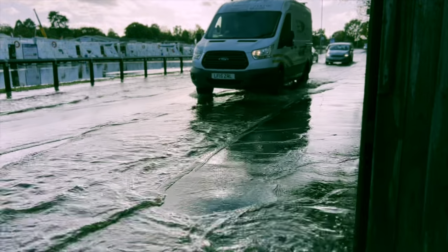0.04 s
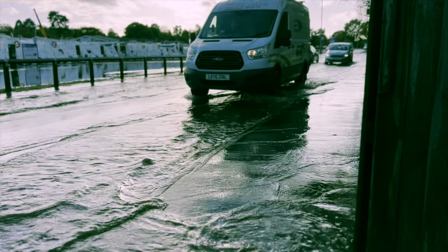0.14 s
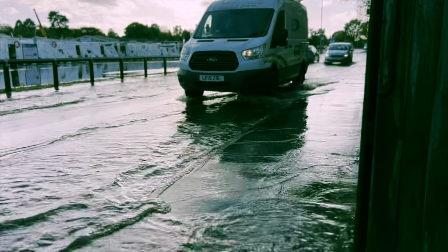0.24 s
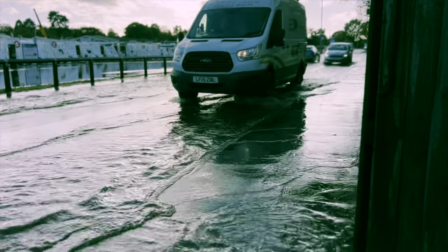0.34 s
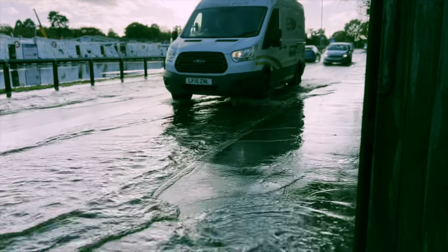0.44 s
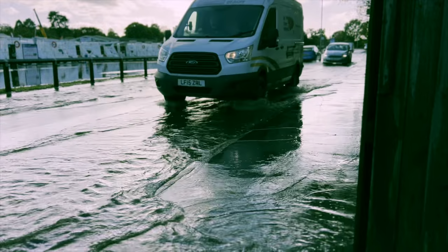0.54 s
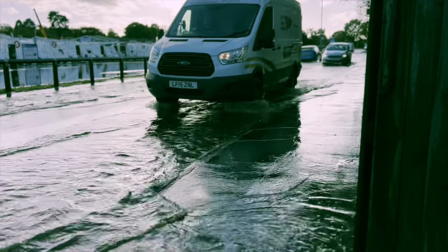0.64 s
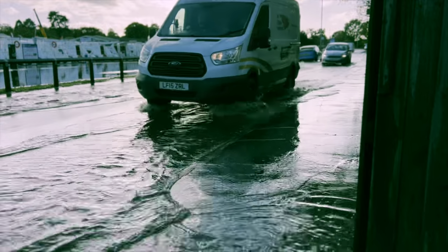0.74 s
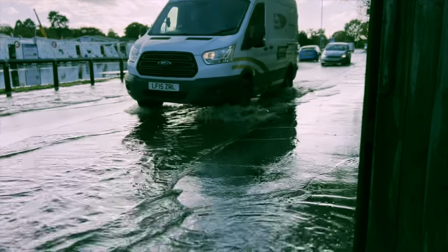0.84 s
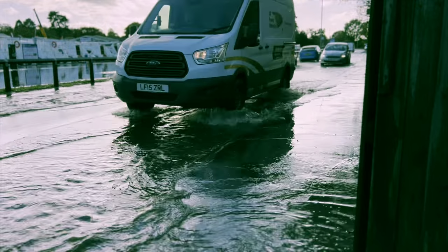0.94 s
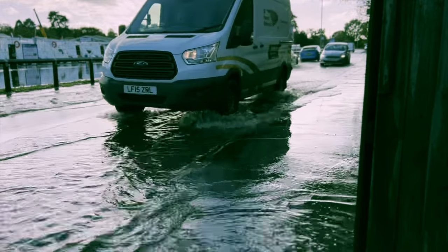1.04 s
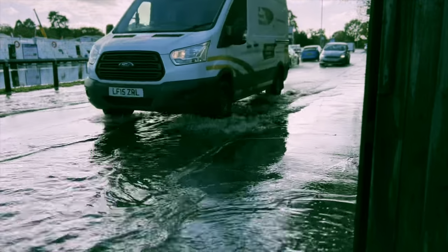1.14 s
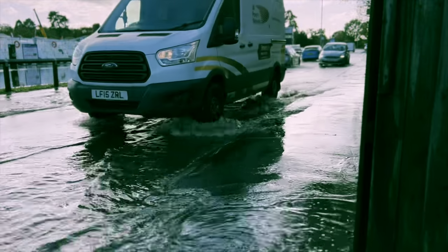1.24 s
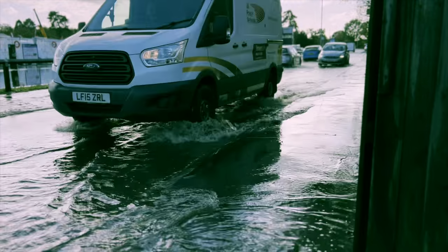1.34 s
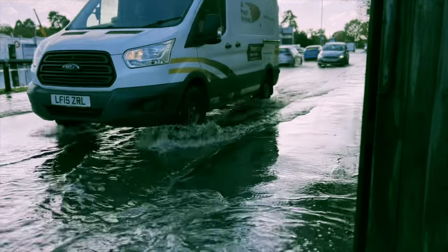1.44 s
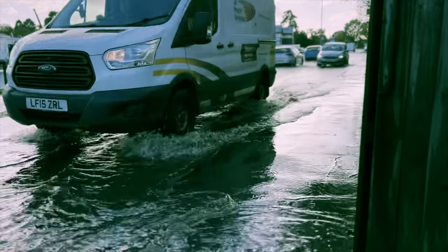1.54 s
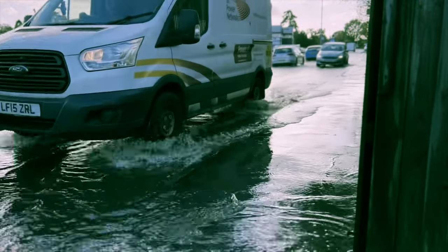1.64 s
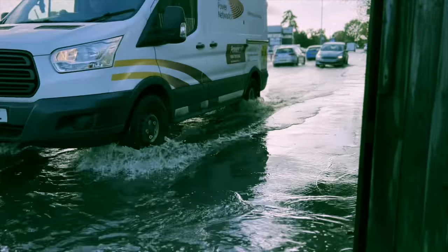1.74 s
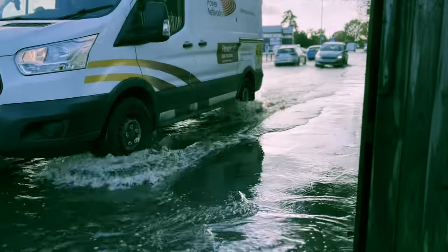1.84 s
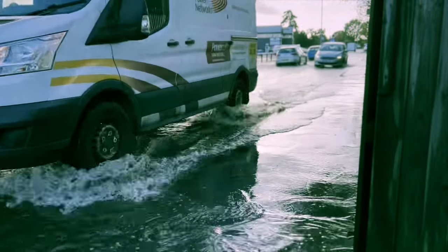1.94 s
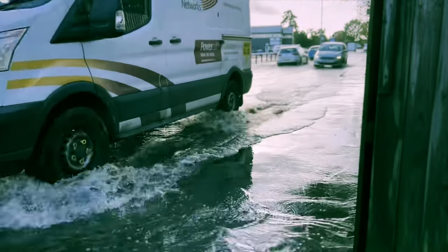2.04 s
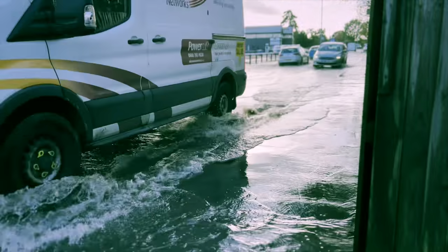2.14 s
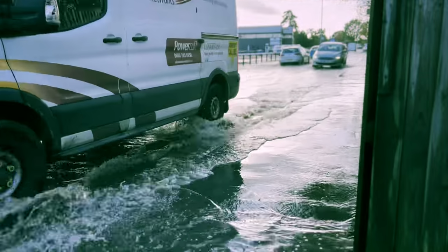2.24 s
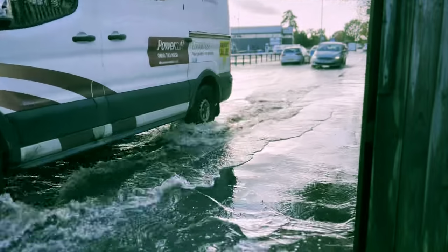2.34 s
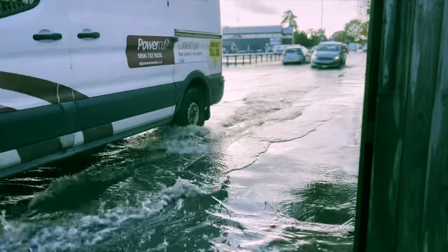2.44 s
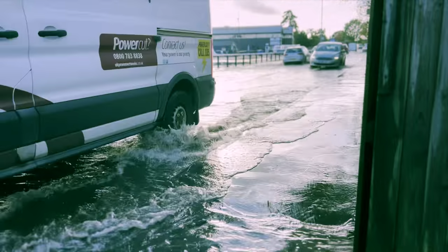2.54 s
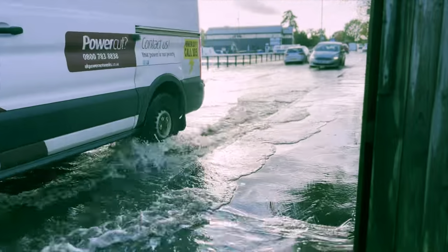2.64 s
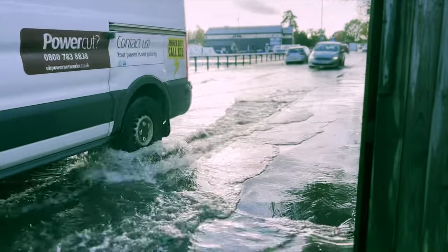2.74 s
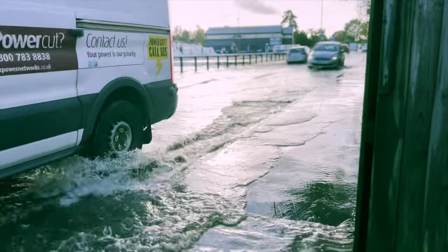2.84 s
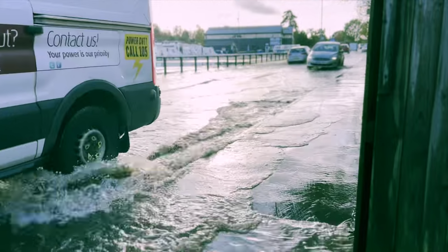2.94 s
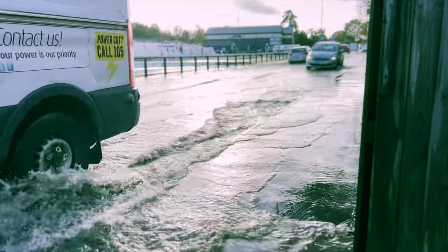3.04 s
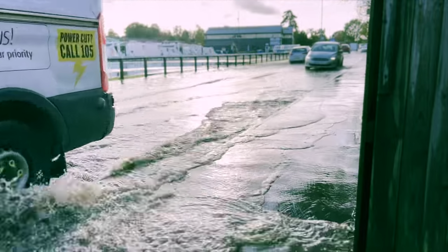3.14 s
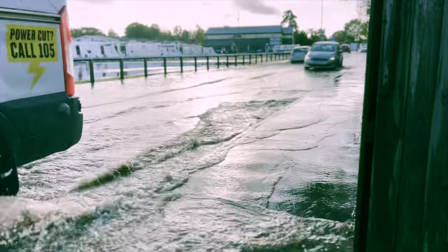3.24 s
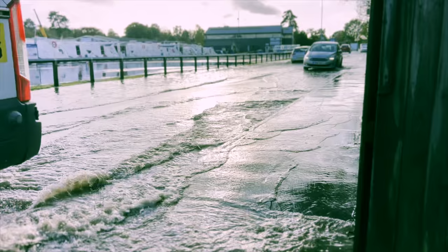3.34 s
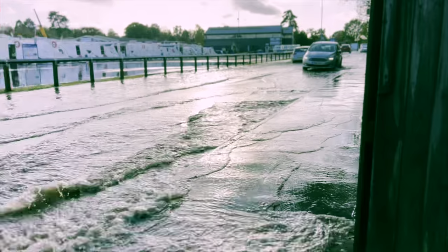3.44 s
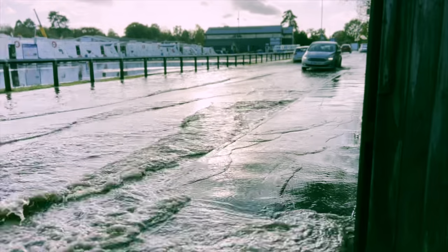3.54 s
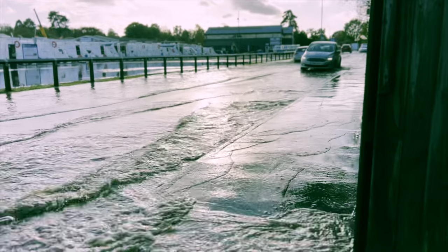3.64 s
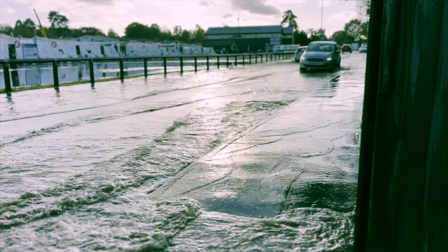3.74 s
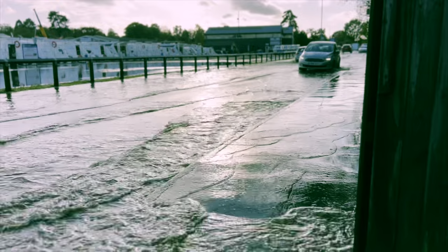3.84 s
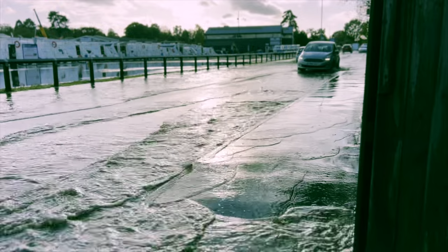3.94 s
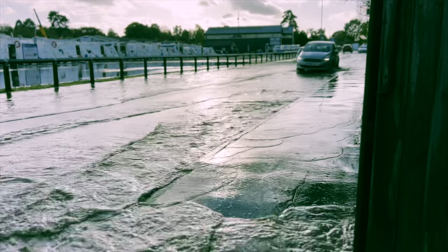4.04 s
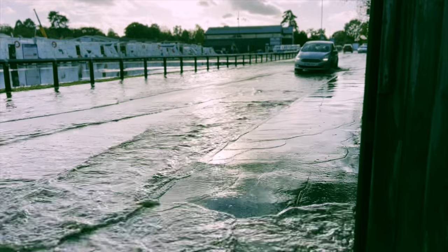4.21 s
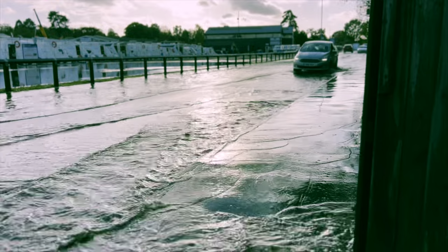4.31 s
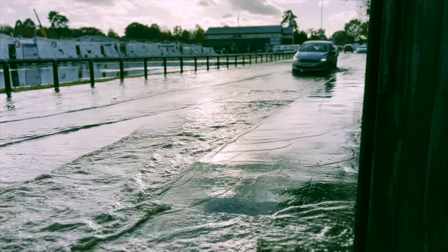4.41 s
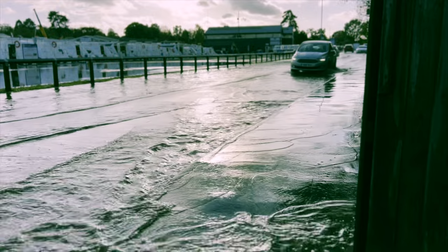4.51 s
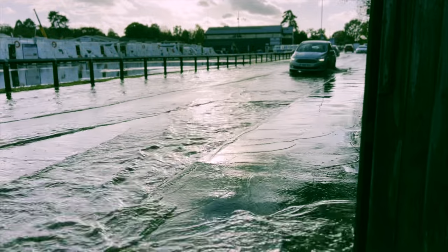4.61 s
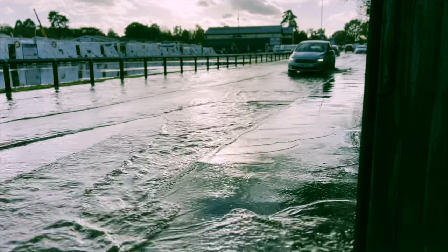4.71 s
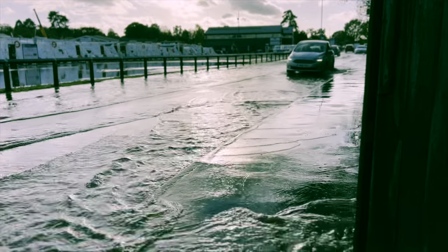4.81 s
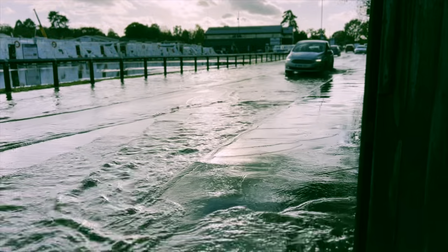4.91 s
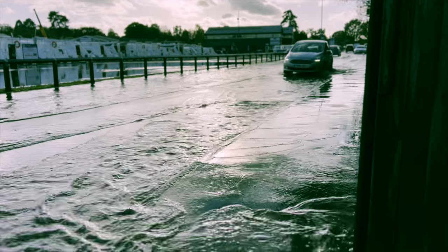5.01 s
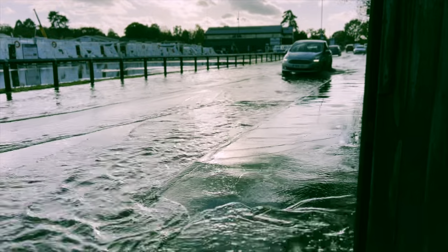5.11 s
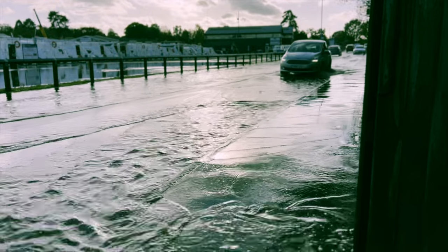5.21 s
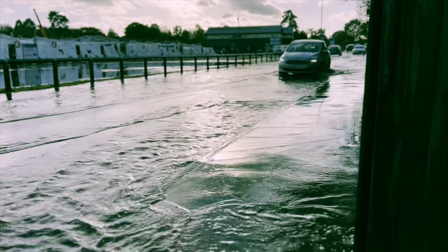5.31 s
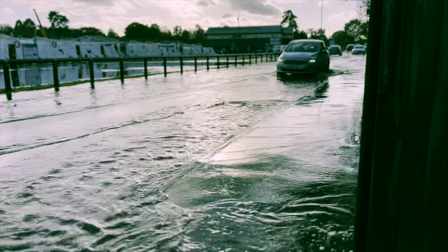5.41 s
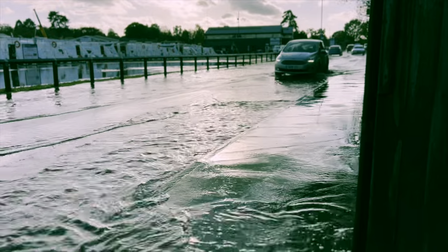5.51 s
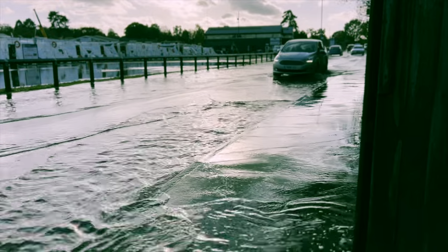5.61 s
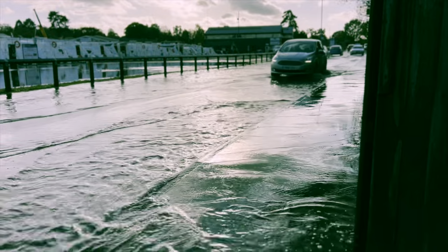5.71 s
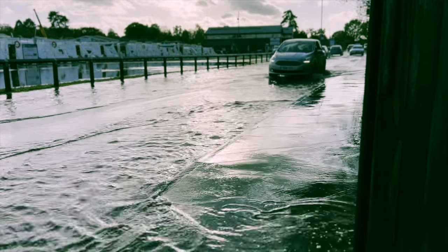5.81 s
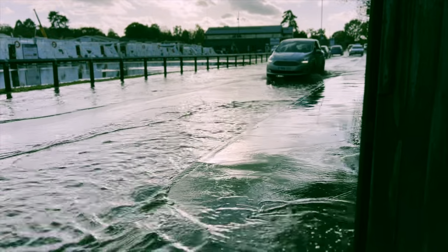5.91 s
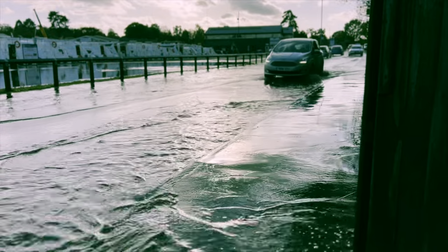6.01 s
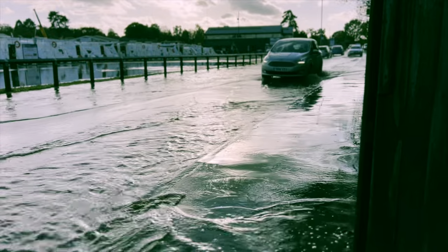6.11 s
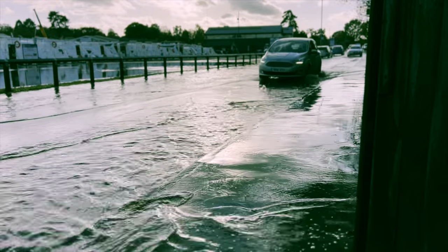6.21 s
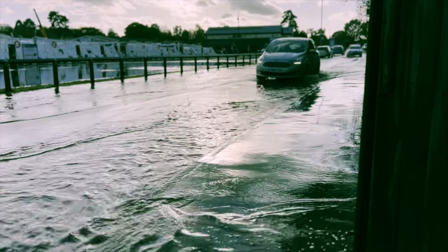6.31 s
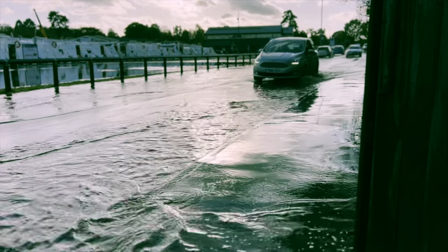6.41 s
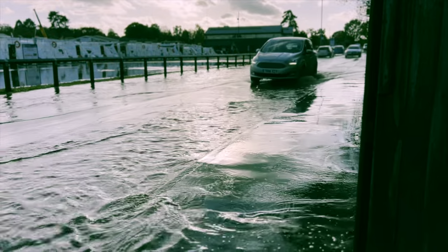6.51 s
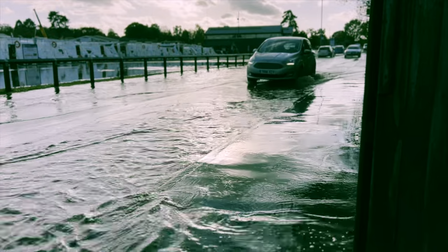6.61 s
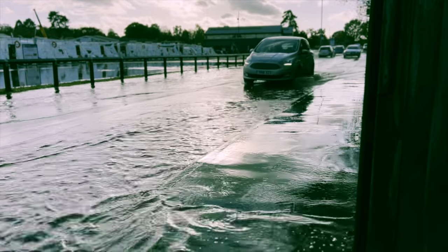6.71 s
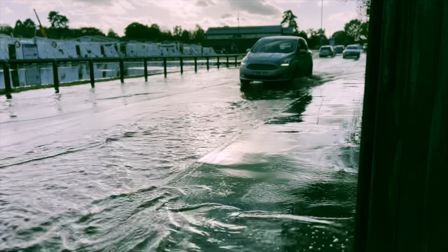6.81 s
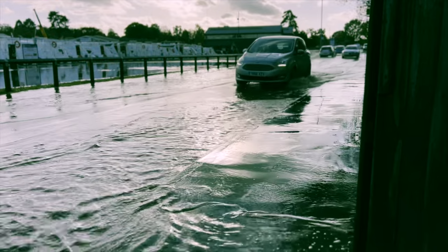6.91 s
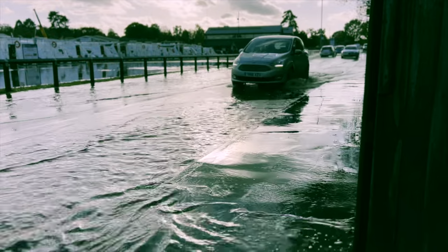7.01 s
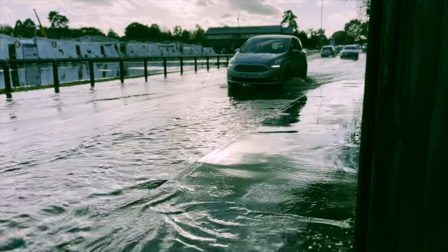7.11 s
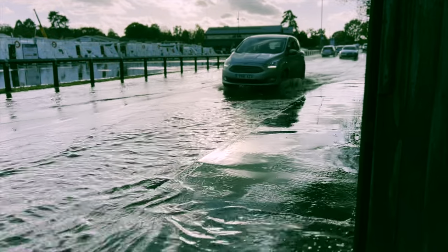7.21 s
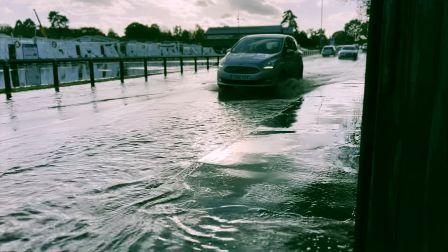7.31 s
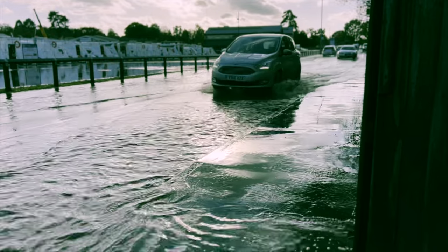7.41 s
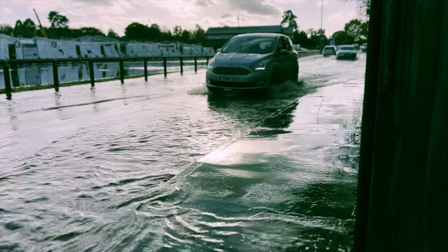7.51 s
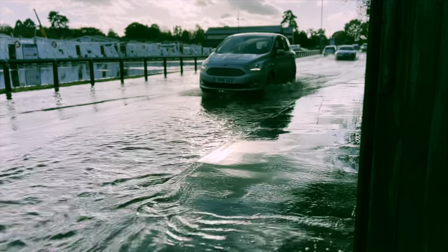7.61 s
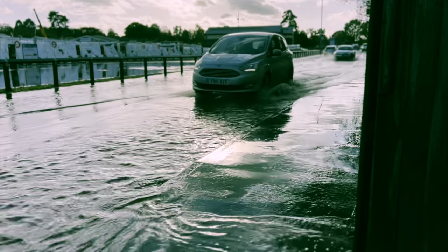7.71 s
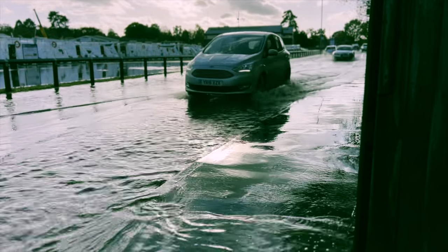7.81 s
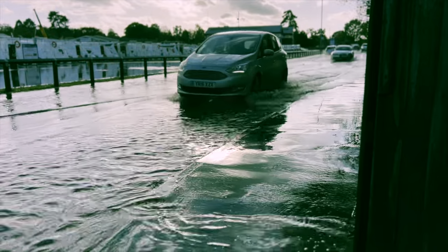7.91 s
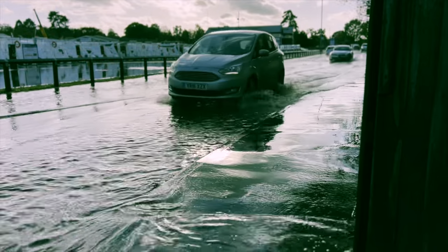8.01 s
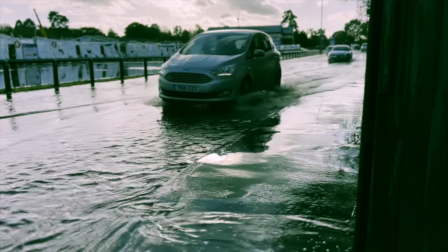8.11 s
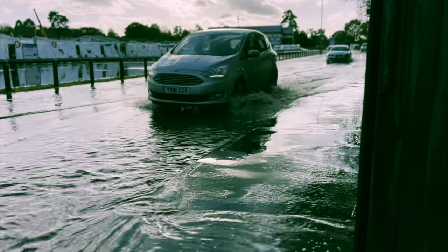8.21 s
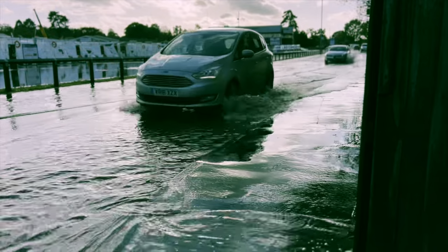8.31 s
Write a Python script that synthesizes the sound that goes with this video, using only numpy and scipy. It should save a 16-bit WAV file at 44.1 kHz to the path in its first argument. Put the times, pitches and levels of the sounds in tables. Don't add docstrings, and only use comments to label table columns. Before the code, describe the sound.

Continuous wet rush and bubbling wash dominate, over low diesel throb and rumble. The van passes close with bursts of splashing and bright spray, its engine climbing in pitch, then dipping sharply at a gear change and fading away. Small waves break near the kerb while a fainter car draws nearer. Open roadside, handheld stereo phone, no speech.

```python
import sys
import numpy as np
from scipy import signal
from scipy.io import wavfile

SR = 44100
rng = np.random.default_rng(int(sys.argv[2]) if len(sys.argv) > 2 else 0)


def file_out(sig):
    cols = np.atleast_2d(sig).T
    lim = np.clip(cols, -1, 1)
    pcm = np.round(lim * 32767).astype(np.int16)
    wavfile.write(sys.argv[1], SR, pcm)


def volts_from_db(level):
    exponent = np.asarray(level, float) / 20
    return 10 ** exponent


N = 368235
FRAME = 1024

# t/s, lead of the left port/ms, edge above which the rush drops away f/Hz,
# wheel-arch ring level/dB, scattered share level/dB (lowest when the wheels are close)
PLACE = [(0, -0.04, 2900, 4, 1.5), (.8, -0.096, 2900, 1, -1.5), (1.6, 0.071, 3300, 3, -2),
         (2.2, 0.057, 3100, 2.5, 1), (2.7, 0.42, 2820, 0.5, 0.5), (3.3, 0.37, 2980, 2.5, -1.5),
         (3.8, 0.41, 2630, 4.5, -2), (4.5, 0.39, 2280, 6, 1), (5.3, 0.23, 2540, 4.5, 1),
         (6.0, 0.045, 2481, 2.5, 2), (7.0, -0.062, 2693, 0, 0), (8.35, -0.058, 3080, 1, -1)]


def rms_one(x):
    return x / np.sqrt(np.mean(x ** 2) + 1e-20)


def in_time(rows):
    s, *columns = np.transpose(rows)
    return [np.interp(np.arange(N) / SR, s, c) for c in columns]


def at_hz(points, hz):
    f, *columns = np.transpose(points)
    return [np.interp(np.log(hz), np.log(f), c) for c in columns]


def drift(rate):
    r = np.exp(-80 * np.pi * rate / SR)
    slow = signal.lfilter([1], [1, -2 * r, r * r], rng.standard_normal(N // 40 + 2002))[2000:]
    return np.interp(np.arange(N) / 40, np.arange(len(slow)), rms_one(slow))


def tones(rate_hz, multiples, gains):
    turn = 2 * np.pi * np.cumsum(rate_hz) / SR + 0.11 * drift(7.4)
    low_lag = 1.45
    total = 0
    for k, gain in zip(multiples, gains):
        waver = volts_from_db(.5 * np.sqrt(k) * drift(8.8))
        phase = k * turn - low_lag / k + 0.087 * k * drift(6.1)
        total = total + np.sqrt(2) * gain * waver * np.cos(phase)
    return total


def van():
    # t/s, firing rate f/Hz, first tone level/dB, tailpipe openness/dB, rasp of the upper tones/dB
    van_engine = [(0.0, 56.0, -25, 6, 2.5), (0.98, 58.8, -19.5, 0.5, 0), (1.3, 59.45, -18.5, 0, 0.5),
                  (1.52, 61.7, -17.5, 1.5, -3.5), (2.2, 63.6, -14.5, -5, -4), (2.45, 64.06, -17, -10, -7.5),
                  (2.85, 68.64, -18.5, 3, 2), (3.95, 80.3, -21.5, 4.5, 3), (4.67, 85.8, -19.5, -5.5, -4),
                  (4.8, 83.1, -20, -12.5, -26), (5.12, 68.4, -21.5, -1.5, -11),
                  (5.21, 64.46, -32, -6, -3.5), (5.6, 48.6, -25, -13, -3), (5.86, 47.1, -29.5, -6, 2),
                  (6.15, 50.3, -23.5, -12, -4), (6.5, 54.8, -23, -10, -9.5), (7.05, 61.43, -29.5, -8, -4),
                  (8.35, 73, -41, -17, 7)]
    # multiple of firing rate, level/dB
    uneven_tones = [(0.75, -10), (1.25, -14), (1.5, -15), (2.501, -8.5), (3.5, -15)]
    rate_hz, first_db, open_db, rasp_db = in_time(van_engine)
    t = np.arange(N) / SR
    behind = np.clip((t - 1.4) / 1.34, 0, 1)

    pipe_hz, pipe_width_hz = 148.27, 15.6
    in_pipe = 1 / (1 + ((2 * rate_hz - pipe_hz) / pipe_width_hz) ** 4)
    second_db = first_db - 12 + 12 * in_pipe + open_db
    third_db = first_db + rasp_db - 8.5 - 4.5 * behind
    uneven_db = first_db + .5 * rasp_db - 12.5

    bonnet_hz, box_hz, body_width_hz, off_load_s = 352, 319.8, 22.3, 5.2
    off_load = np.clip((t - off_load_s) * 4, 0, 1)
    boom_db = first_db + rasp_db - 15 - 12 * off_load + 5 * behind
    body_hz = bonnet_hz + (box_hz - bonnet_hz) * behind
    upper = np.arange(4, 8)
    lifted = [volts_from_db(boom_db) / (1 + ((k * rate_hz - body_hz) / body_width_hz) ** 2) for k in upper]

    weak = [volts_from_db(uneven_db + db) for k, db in uneven_tones]
    strong = [volts_from_db(first_db), volts_from_db(second_db), volts_from_db(third_db)]
    multiples = [1, 2, 3, *upper, *np.array(uneven_tones)[:, 0]]
    return tones(rate_hz, multiples, strong + lifted + weak)


def fan():
    blade_hz, level_db, hidden_s, fade_s = 122.5, -34, 1.5, .8
    t = np.arange(N) / SR
    fade = np.clip((hidden_s - t) / fade_s, 0, 1)
    return np.sqrt(2) * volts_from_db(level_db) * fade * np.sin(2 * np.pi * blade_hz * t)


def from_van(x):
    early_ms = in_time(PLACE)[0]
    late = np.interp(np.arange(N) - .7 * early_ms * SR / 1000, np.arange(N), x)
    tilt_db = .4 + 2.0 * early_ms
    return np.array([x * volts_from_db(-tilt_db), late * volts_from_db(tilt_db)])


def car():
    # t/s, firing rate f/Hz, level/dB
    car_engine = [(0, 78, -25.5), (.7, 75.7, -26), (1.5, 76, -48.5), (2.5, 75.8, -67), (5.0, 75.42, -35),
                  (6.0, 73.8, -30), (6.6, 76.8, -31), (7.1, 74.8, -32), (7.6, 74.2, -34.5),
                  (8.35, 75, -25.5)]
    # multiple of firing rate, level/dB
    car_tones = [(.49, -7), (0.622, -13.5), (1.0, -6.5)]
    rate_hz, level_db = in_time(car_engine)
    return tones(rate_hz, [k for k, db in car_tones], [volts_from_db(level_db + db) for k, db in car_tones])


def pump():
    # f/Hz, left level/dB, right level/dB, lead of the right port/rad
    pump_hum = (467, -47, -43, 2.4)
    hz, left_db, right_db, lead = pump_hum
    turn = 2 * np.pi * hz * np.arange(N) / SR + .3 * drift(2)
    both = [volts_from_db(left_db) * np.sin(turn), volts_from_db(right_db) * np.sin(turn + lead)]
    return np.sqrt(2) * volts_from_db(1.5 * drift(1.5)) * np.array(both)


def short_time(x):
    return signal.stft(x, SR, nperseg=FRAME, noverlap=3 * FRAME // 4)


def to_sound(spectra):
    return signal.istft(spectra, SR, nperseg=FRAME, noverlap=3 * FRAME // 4)[1][:, :N]


def at_ports(shared, colour):
    # f/Hz, likeness [0-1], left minus right level/dB, lead of the left port/rad
    port_pair = [(60, 1, -2.5, 0.24), (302, 0.79, -2.5, 0.14), (690, 0.46, 0.2, 0), (1260, 0.37, -1, 0),
                 (2200, 0.4, -1, 1.1), (3300, 0.13, 2, 1.4), (5000, 0.33, 4.5, 0.88), (7560, 0.6, 4.5, 1.2),
                 (8360, 0.8, 0.5, 0), (9800, 1, 0, 0), (16000, 0.95, 0, 0)]
    hz, s, wave = short_time(shared)
    own = short_time(rng.standard_normal((2, N)))[2]
    hz = np.maximum(hz, 1)[:, None]
    at = np.minimum((s * SR).astype(int), N - 1)
    early_ms, _, _, scatter_db = np.array(in_time(PLACE))[:, at]
    alike, balance_db, lead = at_hz(port_pair, hz)
    apart = np.clip((1 - alike) * volts_from_db(2 * scatter_db), 0, 1)

    turn_hz, period_hz = 8450, 3530
    lead = lead - 2 * np.pi * np.maximum(hz - turn_hz, 0) / period_hz
    lead = lead + 2 * np.pi * hz * early_ms / 1000 * (hz < 3100)
    direct = np.array([wave, wave * np.exp(-1j * lead)])
    both = np.sqrt(1 - apart) * direct + np.sqrt(apart) * own
    sides = np.array([.5, -.5])[:, None, None]
    return hz, at, both * volts_from_db(at_hz(colour, hz)[0] + balance_db * sides)


def rumble():
    # t/s, level/dB
    rumble_swell = [(0, -37.5), (.6, -39), (1.1, -40), (1.6, -39), (3.1, -33.5), (4.5, -38), (5.3, -42),
                    (6.8, -43), (8.35, -41)]
    # f/Hz, level per Hz/dB
    rumble_colour = [(20, -30), (32, -22), (45, 13), (70, 4), (110, 7.5), (200, 3.5), (350, -3.5),
                     (600, -33.5)]
    both = at_ports(rng.standard_normal(N), rumble_colour)[2]
    return volts_from_db(in_time(rumble_swell)[0] + 10 + 1.123 * drift(7.2)) * rms_one(to_sound(both))


def droplets(per_s, spread_db):
    sizes = volts_from_db(spread_db * np.minimum(rng.exponential(1, N), 5)) * rng.standard_normal(N)
    return sizes * (rng.random(N) < per_s / SR)


def bubbles(per_s, cycles):
    pops = droplets(per_s, spread_db=3.0)
    dealt = rng.integers(0, 40, N)
    out = 0
    for k, hz in enumerate(np.geomspace(300, 5000, 40)):
        r, w = volts_from_db(-60 * hz / (cycles * SR)), 2 * np.pi * hz / SR
        ring = signal.lfilter([0, np.sin(w)], [1, -2 * r * np.cos(w), r * r], pops * (dealt == k) + 1e-18)
        out = out + hz * ring
    return rms_one(out)


def surges(rows, hz, s, rise_s, fall_s, octaves):
    start, db, centre_hz = np.transpose(rows)
    late = s - start[:, None]
    swell = np.exp(-(late / np.where(late < 0, rise_s, fall_s)) ** 2)
    return db * np.exp(-(np.log2(hz / centre_hz) / octaves) ** 2) @ swell


def splashes(hz, s):
    # t/s, level above the wash/dB (minus is a lull), centre f/Hz
    slaps = [(.65, 2, 1802), (.93, 1, 6900), (1.16, 1, 8900), (1.32, 0, 900), (1.6, 2.5, 5000),
             (1.91, -2, 8950), (1.98, 5.5, 5000), (2.09, 1.5, 8000), (2.32, 2, 8000), (2.39, -2.5, 5000),
             (2.46, 2.5, 6000), (2.6, 4, 895), (2.6, 3, 11000), (2.85, 0.5, 5960), (3.07, 2, 8020),
             (3.17, 1.5, 11020), (3.289, 0.5, 1205), (3.56, 2, 4000), (3.63, -2, 5000), (3.72, 2, 8030),
             (4.0, 2.5, 794), (6.66, -1, 10000), (7.06, -2, 7000), (7.7, 1.5, 900), (7.9, 2, 4560),
             (8.03, -2, 11000), (8.21, -3.5, 8020), (8.32, 1, 11000)]
    return surges(slaps, hz, s, rise_s=0.023, fall_s=0.029, octaves=1.3)


def waves(hz, s):
    # t/s, level above the wash/dB (minus is a lull), centre f/Hz
    breakers = [(.05, 5, 430), (.7, 5, 430), (1.0, 4, 910), (1.62, 5, 680), (2.2, 3, 700), (2.3, 6.5, 453),
                (2.75, 4, 500), (3.2, 2.5, 848.5), (3.9, 2, 1990), (4.6, -3.5, 1600), (4.7, 2, 910),
                (5.3, 4, 3500), (7.0, -4, 750), (7.33, 4, 1800), (7.95, 2, 1250)]
    return surges(breakers, hz, s, rise_s=.12, fall_s=.16, octaves=0.23)


def bow_wave(hz, s, churn_db):
    far = np.clip(.5 - churn_db / 8, 0, 1)
    bow_hz = 1600 * 2 ** (0.18 * np.maximum(s - 7.4, -2))
    hump_db = 1.5 * np.exp(-(np.log2(hz / bow_hz) / 0.63) ** 2)
    return far * (hump_db - 1.5 * (hz < bow_hz / 2))


def mirrors(hz, at):
    # delay/ms, wander as the wheels move/ms, level/dB
    mirror_paths = [(2.3, .5, -13), (4.1, .6, -12), (6.7, .8, -11), (9.7, 1.1, -11)]
    copies = 0
    for ms, wander, db in mirror_paths:
        delay_s = (ms + wander * drift(0.399)[at]) / 1000
        copies = copies + volts_from_db(db) * np.exp(-2j * np.pi * hz * delay_s)
    return 1 + copies / (1 + (hz / 6000) ** 2) / (1 + (700 / hz) ** 2)


def wash(surge_db, patchy_db):
    # t/s, churn level/dB, nearness of the spray/dB
    water_motion = [(0, -2, -2), (.6, -2.5, -1), (1.3, -0.5, 1.5), (1.9, 0, 5.5), (2.4, 1.5, 5),
                    (2.9, 3, 4.5), (3.5, 2.5, 5), (3.85, 1.5, -1), (4.2, -2.5, -0.5), (4.9, -5, -2.5),
                    (5.5, -6, -6.5), (6.3, -5.5, -5), (6.8, -4, -5.5), (7.3, -4.5, -2), (7.8, -3, -1.5),
                    (8.35, -1.5, 2)]
    band_hz = [800, 2100, 5500, 11500]
    churn_share = [0.93, 1.02, 0.85, 0.81]
    near_share = [0.046, 0.059, 0.43, 0.86]
    # f/Hz, level per Hz/dB
    water_colour = [(200, -1.5), (450, 5), (1000, 2.5), (1400, 1), (2200, -2), (3100, -4), (3500, -6),
                    (4300, -4.5), (5800, -5), (7200, -8.5), (8500, -6), (11300, -8.5), (12600, -12.5),
                    (15500, -15)]
    drops = rms_one(droplets(per_s=6000, spread_db=3.5))
    shared = 0.64 * rng.standard_normal(N) + 0.35 * drops + 0.21 * bubbles(per_s=1500, cycles=41.0)
    hz, at, both = at_ports(shared, water_colour)
    s = at / SR

    churn_db, spray_db = np.array(in_time(water_motion))[:, at]
    levels = np.outer(churn_share, churn_db) + np.outer(near_share, spray_db)
    place = np.interp(np.log(hz), np.log(band_hz), np.arange(4))
    gain_db = np.clip(1 - abs(place - np.arange(4)), 0, 1) @ levels
    gain_db += splashes(hz, s) + waves(hz, s) + bow_wave(hz, s, churn_db)

    edge_hz, arch_db = np.array(in_time(PLACE))[1:3, at]
    gain_db += -5 * (.5 + .5 * np.tanh(7 * np.log2(hz / edge_hz)))
    gain_db += arch_db * np.exp(-(np.log2(hz / 6440) / .25) ** 2)

    near_db = levels[3] - levels[3].mean()
    gain_db += 0.44 * near_db * np.clip(np.log2(hz / 11500), 0, 1)

    third = 3 * np.log2(np.maximum(hz, 150) / 150)
    wavering = np.array([drift(7.1)[at] for k in range(22)])
    flicker = np.clip(1 - abs(third - np.arange(22)), 0, 1) @ wavering
    airy = np.clip(np.log2(hz / 700) / 4, .3, 1)
    gain_db += airy * surge_db * drift(10.7)[at] + patchy_db * flicker

    offsets = np.interp(place, np.arange(4), levels.mean(axis=1))
    return volts_from_db(-21.0) * rms_one(to_sound(both * mirrors(hz, at) * volts_from_db(gain_db - offsets)))


def squeak():
    # t/s, length/s, f/Hz, level/dB
    brake_whistle = (.835, .055, 8150, -38)
    start, length, hz, level_db = brake_whistle
    t = np.arange(N) / SR
    swell = np.sin(np.pi * np.clip((t - start) / length, 0, 1))
    phase = 2 * np.pi * np.cumsum(hz + 60 * drift(44)) / SR
    return volts_from_db(level_db + 3.95 * drift(60)) * swell * np.sin(phase)


def scene():
    engines = from_van(van() + fan()) + car() * volts_from_db(np.array([[-.5], [.5]]))
    return engines + pump() + rumble() + wash(surge_db=0.66, patchy_db=0.55) + squeak()


def low_pass(x):
    return signal.sosfilt(signal.butter(12, 16970, fs=SR, output="sos"), x)


def record(dry):
    thin = signal.sosfilt(signal.butter(4, 38, "high", fs=SR, output="sos"), dry)
    cut = signal.sosfilt(signal.ellip(14, .3, 90, 15730, fs=SR, output="sos"), thin)
    return low_pass(cut)


dry = scene()
out = record(dry)
file_out(out)
```